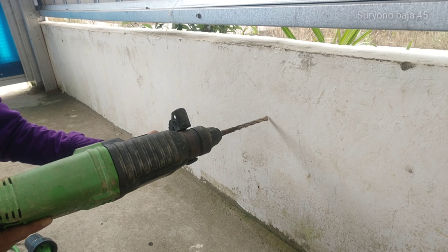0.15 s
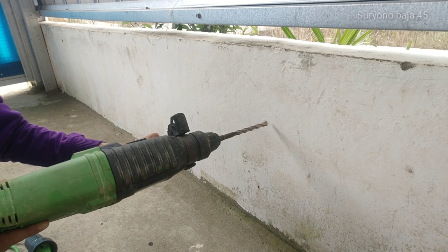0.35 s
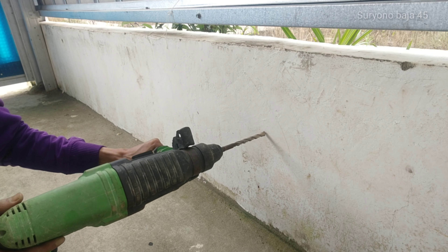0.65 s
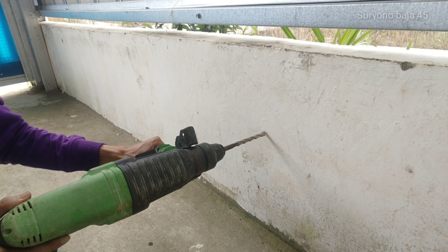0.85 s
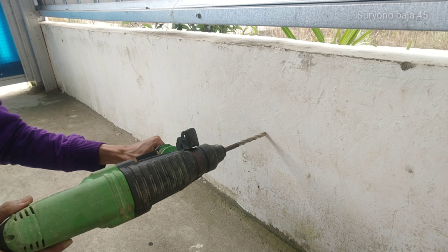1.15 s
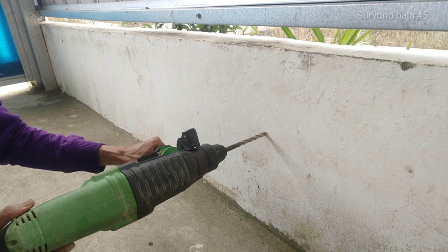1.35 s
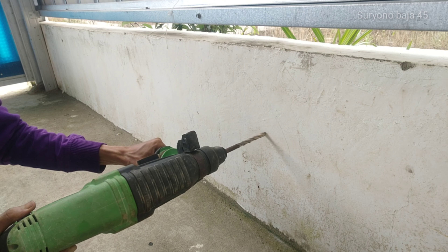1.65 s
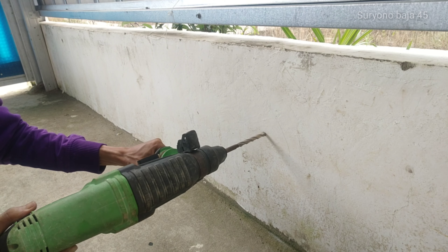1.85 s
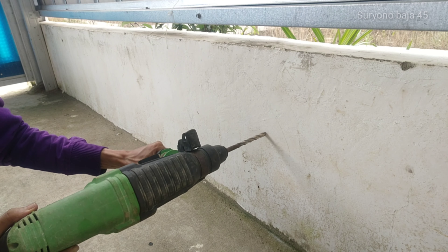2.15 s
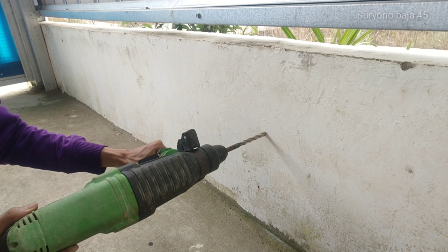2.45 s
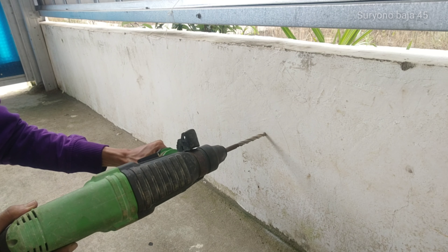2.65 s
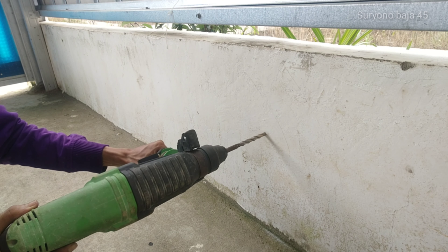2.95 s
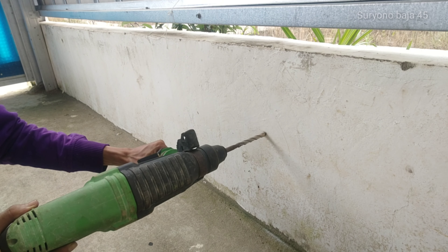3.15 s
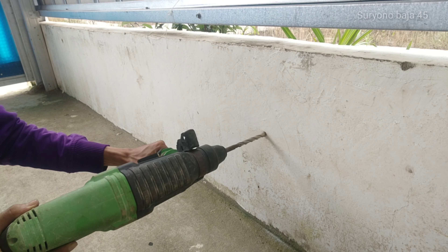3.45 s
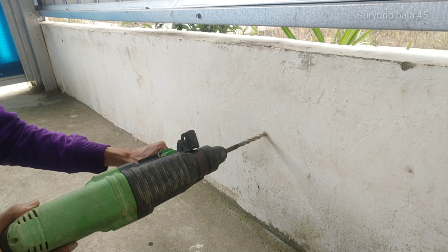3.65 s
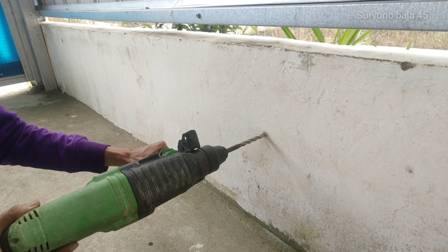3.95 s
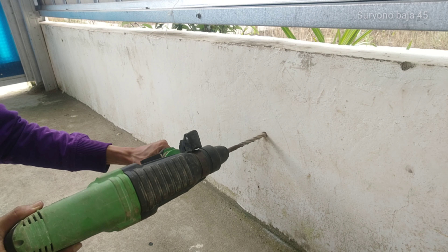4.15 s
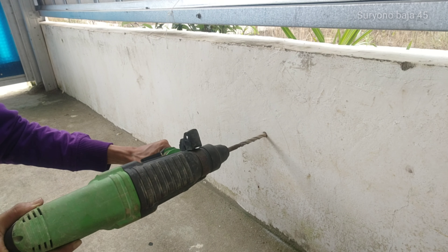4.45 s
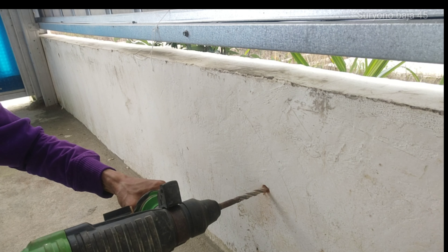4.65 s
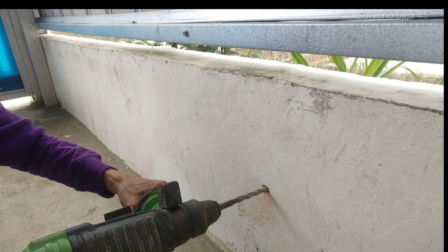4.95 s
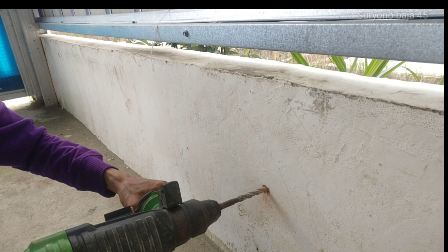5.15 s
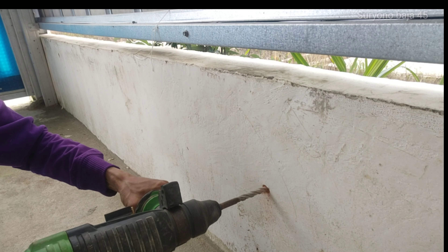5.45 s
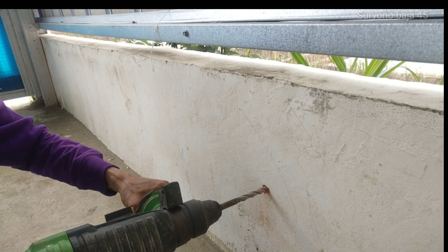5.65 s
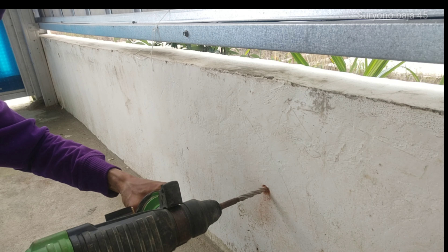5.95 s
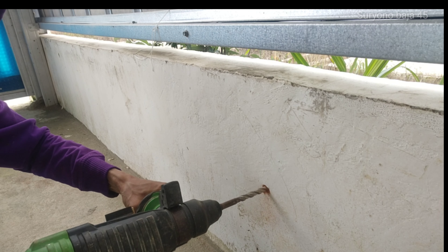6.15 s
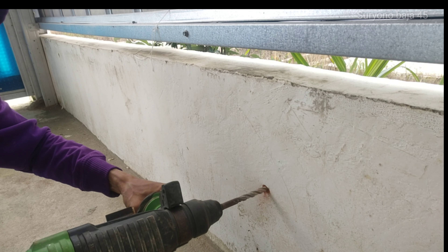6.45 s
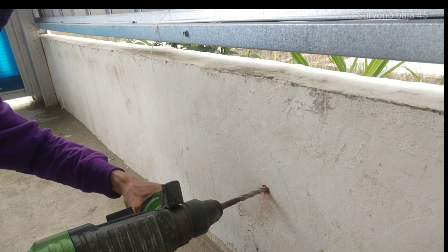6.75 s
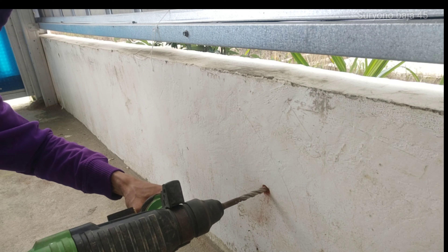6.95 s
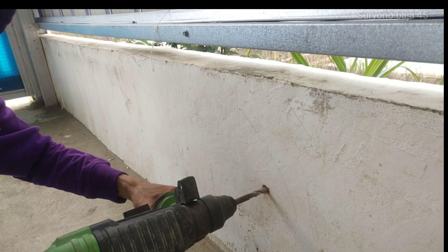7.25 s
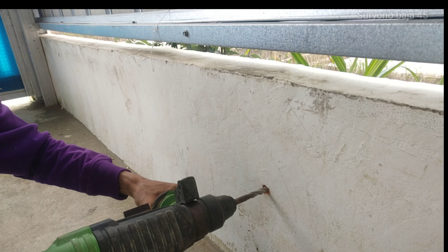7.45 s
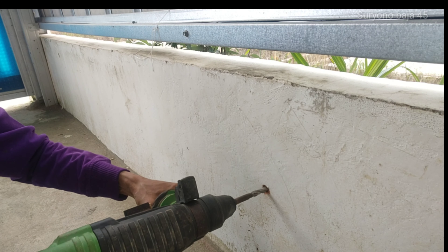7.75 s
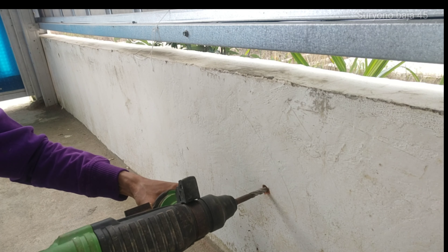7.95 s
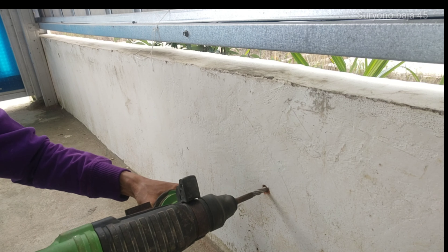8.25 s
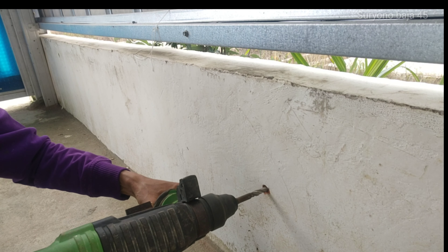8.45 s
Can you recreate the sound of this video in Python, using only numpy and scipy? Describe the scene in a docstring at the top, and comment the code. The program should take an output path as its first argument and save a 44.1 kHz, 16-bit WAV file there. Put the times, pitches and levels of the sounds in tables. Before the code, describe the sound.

Outdoors, close to a plastered wall, faint murmur and hand rustle come before trigger clicks. A rotary hammer drill chugs up briefly and coasts down, clicks, then restarts into a steady rattling, whining run. It fades to a tiny gap, pops abruptly into loud full-speed hammering, and finally unloads into a higher, quieter, rattling whirr. Close stereo microphone, slight wall reflections, low wind buffeting.

```python
"""Outdoors, close to a plastered wall, a rotary hammer drills a hole. One short squeeze of the trigger starts the hole and
a second runs it under light pressure; the sound breaks off and resumes abruptly at full speed, hammering until the bit
is eased back and spins freely. Tones of armature, gears and crank and noise bursts of teeth and striker follow one shaft
speed and take on a colour that changes with the load. Clicks, rubbing hands, buffeting air, a far insect and outdoor
murk lie around it."""
import sys
import numpy as np
from scipy import signal
from scipy.fft import rfft, irfft
from scipy.io import wavfile
from scipy.ndimage import uniform_filter1d

SR = 44100
rng = np.random.default_rng(int(sys.argv[2]) if len(sys.argv) > 2 else 0)


def output_pcm(signal):
    """Save a mono or channel-first signal as 16-bit PCM at the path in sys.argv[1].

    Samples are clipped to [-1, 1] before scaling.
    """
    pcm = np.clip(np.atleast_2d(signal).T, -1, 1) * 32767
    wavfile.write(sys.argv[1], SR, np.round(pcm).astype(np.int16))


N = 379260
T = np.arange(N) / SR
HZ = np.maximum(np.fft.rfftfreq(N, 1 / SR), 1)
RESUME_S = 4.595  # the full-speed run breaks in here
PINION_TEETH, CRANK_TEETH = 7, 33
FREE_HZ = 396.8  # armature turns a second taken as free running


def undb(db):
    """Decibels to gain."""
    return 10 ** (np.asarray(db) / 20)


def unit(x):
    """Scale to rms 1."""
    return x / np.sqrt(np.mean(x ** 2))


def curve(rows, axis=1):
    """One column of a table, joined by straight lines in time."""
    rows = np.array(rows)
    return np.interp(T, rows[:, 0], rows[:, axis])


def colour(rows, axis=1):
    """One column of a spectrum as dB at every frequency, joined along log frequency."""
    rows = np.array(rows)
    return np.interp(np.log(HZ), np.log(rows[:, 0]), rows[:, axis])


def shape(x, gain):
    """Filter by a gain at every frequency."""
    return irfft(rfft(x) * gain, N)


def walk(rate):
    """Random straight ramps of rms 1 that turn about rate times a second."""
    points = rng.standard_normal(8192).astype(np.float32)
    step = max(int(SR / rate), 64)
    points = points[:N // step + 2]
    ramp = np.arange(step, dtype=np.float32) / step
    ramps = points[:-1, None] + np.diff(points)[:, None] * ramp
    return unit(ramps.ravel()[:N])


def knocks(turns, scatter_db):
    """One impulse of random size at each whole turn."""
    hits = np.diff(np.floor(turns), prepend=0)
    at = np.flatnonzero(hits)
    chance = np.clip(rng.standard_normal(N)[at], -2, 1)
    hits[at] *= undb(scatter_db * chance)
    return hits


def bursts(hits, decay_s, rise_s=0.00029):
    """Every knock scrapes out a short burst of noise."""
    for seconds in (decay_s, rise_s):
        hits = signal.lfilter([1], [1, -np.exp(-1 / (seconds * SR))], hits)
    return unit(hits * rng.standard_normal(N))


def tone(turns, flutter=0.33, flutter_rate=45, steady=1):
    """A fluttering machine tone of rms 1, as mid and side; without its steady part it is a rasping band."""
    angle = (2 * np.pi * (turns - np.floor(turns))).astype(np.float32)
    cos, sin = np.cos(angle), np.sin(angle)
    along = steady + flutter * walk(flutter_rate)
    across = flutter * walk(flutter_rate)
    mid = along * cos - across * sin
    side = -along * sin - across * cos
    return unit(np.array([mid, side]))


def rumble(hz, spread=1.33):
    """Low buffeting noise of rms 1 around one pitch, as mid and side."""
    band = 1 / np.sqrt((1 + (HZ / hz / spread) ** 10) * (1 + (hz / spread / HZ) ** 5))
    return unit(shape(rng.standard_normal((2, N)), band))


def scatter(x, t60):
    """A dense tail of reflections; t60 in seconds."""
    t = T[:SR // 4]
    tail = rng.standard_normal(len(t)) * undb(-60 * t / t60)
    return signal.fftconvolve(x, tail / np.linalg.norm(tail))[:N]


def ports(x, elsewhere, direct=0.46):
    """Mid and side: sound from straight ahead reaches the left port first; the rest arrives from elsewhere."""
    direct = np.clip(direct, 0, 1)
    side = -direct * signal.hilbert(x).imag + np.sqrt(1 - direct ** 2) * elsewhere
    return np.array([x, side])


# How hard the bit is leaned on at full speed. Each row: time in seconds, share of the push that holds the bit
# against the bottom of the hole (0-1), relative level of the tool in dB.
PUSH_ON_BIT = [(6.95, 0.94, -34.5), (7.08, 0.96, -34.5), (7.24, 0.69, -36.5), (7.32, .15, -39.5),
               (7.4, 0.01, -37.5), (7.65, 0, -39), (7.8, 0, -40), (8.3, 0, -39.5)]
# Unbalance, gear mesh, fan and commutator tones. Each row: cycles per armature turn, then relative level in dB
# under light pressure, hammering and spinning freely.
ARMATURE_TONES = [(1, -25.5, -25, -27.5), (2, -22, -24, -35), (4, -25.5, -44, -24), (8, -50, -47, -27),
                  (10, -52, -22.5, -23.5), (12, -36, -22, -23), (14, -18.5, -16, -22),
                  (20, -18, -16.5, -12.5), (22, -40, -23, -23), (24, -41, -25, -18)]
# The crank loads the gears unevenly. Each row: cycles per crank turn (rounded to whole cycles when played), then
# relative level in dB under light pressure, hammering and spinning freely.
CRANK_LOAD_TONES = [(10, -25.5, -48, -26), (21, -45, -22.5, -38), (24, -52, -45, -46), (27, -47, -28, -26),
                    (30, -30, -30, -22), (31, -21, -18.5, -28), (32, -27.5, -34, -34), (36, -19, -39, -38),
                    (63.5, -22, -25, -24)]
# Chattering teeth smear the mesh and its overtones into a snarl. Each row: multiple of the mesh rate, then
# relative level in dB under light pressure, hammering and spinning freely.
TOOTH_SNARL = [(1, -18.5, -36, -20), (2, -17, -14.5, -24.5), (3, -12.5, -17, -33)]
# Below this armature speed the steady tones fade by so many dB per Hz
STEADY_HZ, TONES_DB_PER_HZ = 260, .12
# The more the load slows the armature below its free speed, the louder the gear mesh whines
WHINE_DB, WHINE_DB_PER_HZ = -40.5, 0.1716
WHINE_LEAN = -1.2  # under push the gear case radiates more towards the right port


def drill(speed, slow_clatter_db=-1.1):
    """One shaft speed drives tones and clatter; the load on the bit sets their levels and colour."""
    resumed = T >= RESUME_S
    shaft = np.cumsum(speed * (1 + .0013 * walk(30))) / SR
    crank = shaft * PINION_TEETH / CRANK_TEETH

    # gains of the three states: light pressure, hammering, spinning freely
    push = np.clip(curve(PUSH_ON_BIT), 0, 1)
    full_gain = resumed * undb(curve(PUSH_ON_BIT, axis=2))
    gains = [~resumed * light_level(speed), full_gain * np.sqrt(push), full_gain * np.sqrt(1 - push)]

    tones = [tone(np.round(k) * shaft) for k, *_ in ARMATURE_TONES]
    tones += [tone(np.round(k) * crank, flutter=.2) for k, *_ in CRANK_LOAD_TONES]
    tones += [tone(np.round(k) * PINION_TEETH * shaft, flutter_rate=260, steady=0) for k, *_ in TOOTH_SNARL]
    tone_db = np.vstack([ARMATURE_TONES, CRANK_LOAD_TONES, TOOTH_SNARL])[:, 1:]
    chords = np.tensordot(undb(tone_db).T, np.array(tones), 1)

    # a slow motor loses its steady tones and some of its clatter; the straining gears take over
    lagging = np.clip(1 - speed / 255, 0, 1)
    singing = undb(-TONES_DB_PER_HZ * np.maximum(STEADY_HZ - speed, 0))
    clattering = undb(slow_clatter_db * np.minimum(2 * lagging, 1))
    strain = straining(shaft, speed) * ~resumed
    ahead, around = clatter(shaft, crank, speed), clatter(shaft, crank, speed)
    out = 0
    for state, gain in enumerate(gains):
        noise = clattering * ports(ahead[state], around[state])
        force = noise + singing * chords[state] + strain
        out = out + gain * shape(force, body_gain(state))

    mesh_mid, mesh_side = tone(PINION_TEETH * shaft, flutter=0.1, flutter_rate=45)
    whine_gain = resumed * undb(WHINE_DB + WHINE_DB_PER_HZ * (FREE_HZ - speed))
    whine = np.array([mesh_mid, mesh_side + WHINE_LEAN * push * mesh_mid]) * whine_gain
    whine = whine * undb(1.095 * (1 - push) * walk(300))  # unsteady once the load is off

    out = jolted(soften(out, lagging) + rattle() * resumed * (1 - push))
    return out + wall(out[0] * ~resumed) + whine


# The finger moves the trigger in steps. Each row: time in seconds, armature speed asked for in Hz (0 = let go),
# lag of the motor in seconds.
TRIGGER_STEPS = [(.895, 12, .03), (.972, 104, .036), (1.05, 200, 0.47), (1.225, 165, 0.049),
                 (1.27, 215, .19), (1.468, 0, 0.5), (1.955, 7, 0.047), (1.988, 15, .01), (2.027, 88, .022),
                 (2.074, 155, .022), (2.23, 330, .42), (2.285, 265.5, .13), (3.1, 269, .2), (3.6, 259, .46),
                 (4.22, 273, .14)]
# At full trigger the speed sags with the load on the bit. Each row: time in seconds, armature speed in Hz.
FULL_TRIGGER_SPEED = [(4.62, 379.7), (5.32, 380.7), (5.71, 385.3), (6.79, 387.0), (7.0, 383.6),
                      (7.08, 379.8), (7.2, 388.7), (7.26, 385.8), (7.31, 394.2), (7.45, 399.9),
                      (7.86, 398.5), (8.56, 392.7)]
FRICTION_HZ = 100  # a coasting motor heads for this far below standstill, so it stops in finite time


def armature_speed():
    """Turns a second: the motor lags behind each trigger step, coasts against friction, and later runs flat out."""
    speed = np.zeros(N)
    for s, asked_hz, lag_s in TRIGGER_STEPS:
        start = int(s * SR)
        goal = asked_hz if asked_hz > 0 else -FRICTION_HZ
        approach = np.exp(-T[:N - start] / lag_s)
        speed[start:] = np.maximum(goal + (speed[start] - goal) * approach, 0)
    return np.where(T >= RESUME_S, curve(FULL_TRIGGER_SPEED), np.maximum(speed, 1))


# The tool grows louder with speed, falls silent near standstill and rattles harder just after a jump in speed
LIGHT_DB, LIGHT_HZ, DB_PER_DECADE, STALL_HZ = -33.5, 268, 12, 20.2
SURGE_DB_PER_HZ, SURGE_S = 0.008, 0.066


def light_level(speed):
    """Gain of the tool under light pressure, from its speed and the speed it has just gained."""
    gained = np.maximum(speed - np.interp(T - SURGE_S, T, speed), 0)
    db = LIGHT_DB + DB_PER_DECADE * np.log10(speed / LIGHT_HZ) + SURGE_DB_PER_HZ * gained
    return undb(db) / (1 + (STALL_HZ / speed) ** 2)


def clatter(shaft, crank, speed):
    """What shakes the tool in each state: rattling teeth, striker blows, crumbling plaster and fan air."""
    slow = np.sqrt(np.max(speed) / np.maximum(speed, 15))  # fewer knocks each carry more of the sound
    # the piston loads the gears once a crank turn: a slow motor chugs
    throb = undb(3.5 * np.cos(2 * np.pi * crank) * np.clip(slow - 1.1, .1, .6))
    # the pinion presses harder on one side of every turn
    wobble = undb(2 * np.cos(2 * np.pi * (shaft + 0.24 * walk(70))))
    tooth_knocks = knocks(shaft * PINION_TEETH + 0.65 * walk(400), 2.3) * slow
    teeth = bursts(tooth_knocks, 0.00081) * throb * wobble
    backlash = bursts(knocks(shaft + .12 * walk(150), 3.3) * slow, 0.001)
    # the striker hits and rebounds once each per crank turn; every blow crushes a burst of grit
    stroke = crank + .085 * walk(35)
    grit = bursts(knocks(2 * stroke, 2.49), 0.0018) * undb(3 * np.cos(6 * np.pi * stroke - 1))
    air = rng.standard_normal(N) * undb(0.73 * walk(25))

    light = teeth + undb(-8) * backlash + undb(-15) * grit + undb(-2.5) * air
    light = light / np.sqrt(uniform_filter1d(light ** 2, SR // 12))  # lumpier when slow, but no stronger
    hammering = grit + undb(-3.0) * teeth + undb(-6.0) * backlash + undb(7.0) * air
    free = (air + undb(-3) * teeth + undb(-7.5) * backlash) * undb(1.134 * walk(70))
    return unit(light), unit(hammering), unit(free)


# Broad colour of tool and wall. Each row: frequency in Hz, then relative level in dB under light pressure,
# hammering and spinning freely.
BODY_COLOUR = [(70.08, -19, -11, -13), (145, -9, -15, -9), (214, -13, -11.5, -15.5), (600, -8.5, -2.5, -3),
               (1320, -.5, 4, -5.5), (2330, 5.5, 8.5, -1), (4560, -4.5, -1.5, -6.5), (6800, -8.5, -6.5, -4),
               (9670, -5, -4, -11.5), (12030, -17, -18, -14.5), (15000, -26.5, -26.5, -21)]
# Peaks and dips in the tool's colour, including high whirring bands when spinning freely. Each row: centre in Hz,
# width in Hz, then lift in dB under light pressure, hammering and spinning freely.
COLOUR_PEAKS_AND_DIPS = [(276, 79, 7.5, 4.5, 2), (392, 104, 5, 3, 10.5), (490, 59, 7, -2, 0.5),
                         (752, 164, 4.5, 8, 0), (812, 64, 4, -0.5, 9), (1010, 433, 7.5, 1.5, 11.5),
                         (1584, 304, 6, 4, 9.5), (1836, 810, 5, -0.5, 8), (2190, 110, 2.5, 2.5, 1),
                         (2810, 290, 4.5, 1.5, 8.5), (3127, 370, 6, -1, 9.5), (3604, 214, 3.5, 2.5, 7.5),
                         (3930, 220, 0, -4.5, 16), (4830, 610, 7, 8, 4), (5490, 290, 0, -6.5, 13.5),
                         (5840, 260, 4, 0.5, 8), (6160, 220, 0.5, 0, -6), (7250, 230, -3, -2.5, 3.5),
                         (7850, 220, 1, 2, 5.5), (8600, 300, 1.5, 0, 8), (9100, 410, 0.5, 1, 13),
                         (10380, 380, 1, -1, 12), (11930, 350, -2, -2, 10.5), (13400, 450, 0, -1, 7),
                         (14250, 350, 0, 0, 6)]


def body_gain(state):
    """Colour of tool and wall in one state of loading: a broad curve with peaks and dips; the bass radiates poorly."""
    db = colour(BODY_COLOUR, axis=1 + state)
    for hz, width, *lift_db in COLOUR_PEAKS_AND_DIPS:
        db = db + lift_db[state] / (1 + (2 * (HZ - hz) / width) ** 2)
    return unit(undb(db) / np.sqrt(1 + (150 / HZ) ** 4))


# The gears whine under light pressure. Each row: multiple of the mesh rate, relative level in dB, change in dB when
# not speeding up, flutter depth, flutter rate in Hz, armature speed in Hz above which it fades.
GEAR_STRAIN = [(1, -15.5, -2.5, .2, 90, 290), (2, -19, -6, 0.59, 150, 230), (3, -25, -10, 0.72, 200, 220),
               (4, -26, -6, 0.88, 200, 150)]
STRAIN_TOP_HZ = 2810  # the whine dies away above this pitch


def straining(shaft, speed):
    """The gear mesh and its overtones swell as they glide through the gear case, loudest while the motor speeds up."""
    gaining = np.gradient(speed) * SR
    torque = uniform_filter1d(np.clip(gaining / 130, 0, 1), SR // 16).clip(0, 1)
    out = 0
    for k, db, slack_db, flutter, rate, fade_hz in GEAR_STRAIN:
        teeth = np.round(k) * PINION_TEETH
        hz = teeth * speed
        gain = undb(db + slack_db * (1 - torque)) * case_gain(hz)
        gain = gain * np.clip(speed / 115, 0, 1) / (1 + (760 / hz) ** 6)  # weak when slow or low
        gain = gain / np.sqrt(1 + (hz / STRAIN_TOP_HZ) ** 8) / (1 + (speed / fade_hz) ** 6)
        out = out + gain * tone(teeth * shaft, flutter=flutter, flutter_rate=rate)
    return out


# The gear case rings with slow knocks and with tones that glide through it. Each row: centre in Hz, width in Hz,
# lift in dB.
GEAR_CASE_MODES = [(1580, 350, 6), (1840, 150, -3), (2120, 150, 4.5), (2390, 200, -5), (2640, 240, 9),
                   (3070, 410, 6.5)]


def case_gain(hz):
    """How strongly the gear case answers a tone of this pitch."""
    db = sum(lift_db / (1 + (2 * (hz - centre_hz) / width) ** 2) for centre_hz, width, lift_db in GEAR_CASE_MODES)
    return undb(db)


def soften(x, lagging, soft_hz=3650, slow_db=-.6):
    """Slow knocks are duller than fast ones and ring the gear case more."""
    dull = shape(x, undb(slow_db) * case_gain(HZ) / (1 + (HZ / soft_hz) ** 4))
    return x + 0.56 * lagging * (dull - x)


# What the chuck rings with. Each row: centre in Hz, width in Hz, relative level in dB.
CHUCK_MODES = [(1095, 350, -4.5), (1684, 400, 2), (2240, 400, -3), (4500, 800, -15)]
# Out of contact the bit rattles in the chuck, harder once in every turn of the spindle
RATTLE_DB, RATTLE_PER_S, SPINDLE_HZ, RATTLE_SWING_DB = -46.5, 110, 16, 3


def rattle(ring_s=0.0021, scatter_db=5):
    """The free bit knocks unevenly against the chuck."""
    swing = undb(RATTLE_SWING_DB * np.cos(2 * np.pi * (SPINDLE_HZ * T + .2 * walk(5))))
    hits = knocks(RATTLE_PER_S * T + .5 * walk(90), scatter_db) * swing
    band = sum(undb(db) / (1 + (2 * (HZ - hz) / width) ** 4) for hz, width, db in CHUCK_MODES)
    ahead, around = (unit(shape(bursts(hits, ring_s), band)) for _ in range(2))
    return ports(ahead, around) * undb(RATTLE_DB + 1.4 * walk(7))


# The loose bit catches in the hole and jolts the tool. Each row: start in seconds, lift in dB at the peak, for the
# low end of the tool's sound.
BIT_JOLTS = [(1.019, 5.5), (1.057, 5), (1.093, 5), (1.123, 2.5), (1.181, 5.5), (1.235, 3.5), (1.289, 3),
             (1.318, 3), (1.352, 5.5), (1.382, 4.5), (1.442, 4.5), (1.553, 4.5), (1.693, 6), (1.736, 5),
             (1.788, 3), (2.11, 5), (2.124, 5), (2.206, 5.5), (2.251, 4), (2.291, 5), (2.338, 3.5),
             (7.064, 1.5), (7.121, 2.5), (7.189, 3.5), (7.424, 1.5), (7.478, 4), (7.547, 3), (7.672, 4),
             (7.837, 3), (8.026, 4), (8.287, 2), (8.334, -1)]
JOLT_S, JOLT_TOP_HZ = 0.0031, 4200  # time to the peak of a jolt; jolts are dull above this pitch


def jolted(x):
    """Each jolt swells the tool's sound quickly and dies away."""
    lift = np.zeros(N)
    age = T[:SR // 20] / JOLT_S
    for s, lift_db in BIT_JOLTS:
        start = int(s * SR)
        lift[start:start + len(age)] += (undb(lift_db) - 1) * age * np.exp(1 - age)
    return x + lift * shape(x, 1 / (1 + (HZ / JOLT_TOP_HZ) ** 2))


def wall(x, level_db=-18.5, t60_s=.3):
    """Wall and floor answer the tool with a short, faint tail, as mid and side."""
    return np.array([scatter(x, t60_s) for _ in range(2)]) * undb(level_db)


def pop(decay_s=0.00015, level_db=-16.5):
    """The full-speed run breaks in with a small pop: one sharp step that decays at once."""
    since = T - RESUME_S
    x = (since >= 0) * np.exp(-np.abs(since) / decay_s) * undb(level_db)
    return np.array([x, x])


# Hands shift on the grip, the trigger clicks, gear teeth take up their play. Each row: start in seconds, peak of the
# dry knock in dB, pitch in Hz, time to ring down by 60 dB in seconds.
HANDLING_CLICKS = [(.279, -69, 5200, .05), (0.367, -59.5, 2840, .025), (.368, -61, 1150, .03),
                   (.576, -70, 5000, .04), (.651, -63, 7500, .05), (0.654, -55, 450, 0.088),
                   (.881, -52, 500, 0.064), (.901, -49, 1580, 0.054), (.943, -47, 900, .04),
                   (.961, -41.5, 1500, .05), (.972, -51, 2500, .04), (.988, -49, 8000, .03),
                   (1.87, -44, 1700, 0.026), (1.878, -49, 1937, 0.024), (1.894, -46, 1580, .025),
                   (1.902, -46, 1786, .025), (1.922, -55, 1790, .025), (1.99, -49.5, 1700, 0.051),
                   (2.035, -37, 1390, 0.057)]


def clicks(crack_db=-22, sharpness=3.0):
    """Short dry knocks in the plastic housing, answered by wall and floor."""
    out, t = np.zeros(N), T[:SR // 10]
    for s, db, hz, t60 in HANDLING_CLICKS:
        crack = rng.standard_normal(len(t))
        ring = signal.lfilter(*signal.iirpeak(min(hz, SR / 3), sharpness, fs=SR), crack)
        hit = (unit(ring) + undb(crack_db) * crack) * undb(-60 * t / t60)
        start = int(s * SR)
        out[start:start + len(t)] += undb(db) * hit / np.max(np.abs(hit))
    return ports(out, scatter(out, 0.1))


# Sleeve and hands rub as the tool is lined up. Each row: loudest moment in seconds, half length in seconds,
# level in dB, pitch in Hz.
GRIP_RUSTLES = [(0.078, .09, -77, 1200), (.29, 0.076, -80, 900), (0.795, 0.081, -80.5, 1100)]


def rustles():
    """Faint, grainy rubbing of cloth and skin on the grip."""
    out = 0
    for s, half_s, db, hz in GRIP_RUSTLES:
        grains = rng.standard_normal((2, N)) * undb(4.4 * walk(90))
        rub = shape(grains, 1 / np.hypot(HZ / hz, hz / HZ) ** 1.8)
        out = out + unit(rub) * undb(db) * np.exp(-((T - s) / half_s) ** 2)
    return out


# Gusts buffet the microphone. Each row: start, rise, hold and fall in seconds, relative level in dB, pitch in Hz.
WIND_GUSTS = [(-.05, 0.053, 0.37, 0.087, -71, 145), (.75, .12, .12, 0.16, -60, 105),
              (1.22, 0.099, .68, .1, -74.5, 104), (2.3, 1.5, .42, .5, -60, 130),
              (4.72, .1, 0.048, .12, -67, 125), (5.12, .5, 1.53, 0.26, -55.5, 124),
              (7.81, 0.061, .02, .06, -62, 110)]
FAN_DRAUGHT_DB, FAN_DRAUGHT_HZ = -75.5, 108  # the cooling fan's draught at free speed, and its pitch


def draught(speed):
    """Moving air rumbles on the microphone: gusts that swell, hold and die, over the draught of the fan."""
    out = rumble(FAN_DRAUGHT_HZ) * undb(FAN_DRAUGHT_DB) * speed / FREE_HZ
    for s, rise, hold, fall, db, hz in WIND_GUSTS:
        ramp = np.minimum((T - s) / rise, (s + rise + hold + fall - T) / fall)
        out = out + rumble(hz) * undb(db) * np.clip(ramp, 0, 1) ** 2
    return out * undb(2.2 * walk(16))


# A distant insect trills in spells. Each row: start in seconds, length in seconds.
INSECT_SPELLS = [(-.05, .29), (.31, .11), (.47, .38)]


def insect(swell_s=.04, pitch_hz=7060, level_db=-95):
    """A thin, far-off trill: one high tone, mostly flutter."""
    spells = sum(np.clip(np.minimum(T - s, s + length - T) / swell_s, 0, 1) for s, length in INSECT_SPELLS)
    return tone(pitch_hz * T, flutter_rate=220, steady=.2) * spells * undb(level_db)


# Distant outdoor murk of wind and traffic. Each row: frequency in Hz, relative level in dB per Hz.
OUTDOOR_COLOUR = [(30, -10), (90, -17), (160, -0.5), (260, -11), (400, -6), (560, -14), (700, -23),
                  (1150, -19.5), (1800, -30), (3000, -29), (4500, -34), (8000, -39), (11000, -49),
                  (15000, -49)]
# How loud the murk lies. Each row: time in seconds, level in dB.
OUTDOOR_FADER = [(0, -68.5), (.2, -73), (.38, -70.5), (.48, -77), (.8, -74)]


def outdoors():
    """A faint background whose rumble and hiss waver apart."""
    air = unit(shape(rng.standard_normal((2, N)), undb(colour(OUTDOOR_COLOUR))))
    low = shape(air, 1 / (1 + (HZ / 700) ** 4))
    wavering = low * undb(2 * walk(16)) + (air - low) * undb(2 * walk(24))
    return wavering * undb(curve(OUTDOOR_FADER))


# Stereo width at the microphone ports. Each row: frequency in Hz, side gain over mid in dB.
STEREO_WIDTH = [(30, -9), (60, -18), (110, -16.5), (200, -13), (380, -7), (700, -7.5), (1290, -5),
                (2380, 1), (4400, -2.5), (8120, 0.5), (15000, 0)]
# Stereo balance of the ports. Each row: frequency in Hz, left gain over right in dB.
STEREO_LEAN = [(60, -1.0), (110, -0.62), (200, -2.5), (380, 2.8), (700, -0.14), (1290, -0.16), (2380, -1.4),
               (4400, 1), (8120, -0.3), (15000, -2.5)]


def left_right(mid_side):
    """Mid and side as they reach the two microphone ports."""
    mid, side = mid_side[0], shape(mid_side[1], undb(colour(STEREO_WIDTH)))
    lean_db = colour(STEREO_LEAN) / 2
    return np.array([shape(mid + side, undb(lean_db)), shape(mid - side, undb(-lean_db))])


BREAK_S, FADE_S = 4.56, 0.12  # the light run has faded out by then, over this long


def scene():
    """All sources as left and right, with a moment of silence before the full-speed run."""
    speed = armature_speed()
    tool = left_right(drill(speed) + pop()) * (T >= TRIGGER_STEPS[0][0])
    surroundings = left_right(clicks() + rustles() + draught(speed) + outdoors() + insect())
    fade = np.clip((BREAK_S - T) / FADE_S, 0, 1) ** 1.75
    return (tool + surroundings) * np.where(T < RESUME_S, fade, 1)


def record(dry, top_hz=15500):
    """The microphone's steep low-pass cuts the top."""
    return signal.sosfilt(signal.ellip(8, .2, 70, top_hz, fs=SR, output="sos"), dry)


dry = scene()
out = record(dry)
output_pcm(out)
```